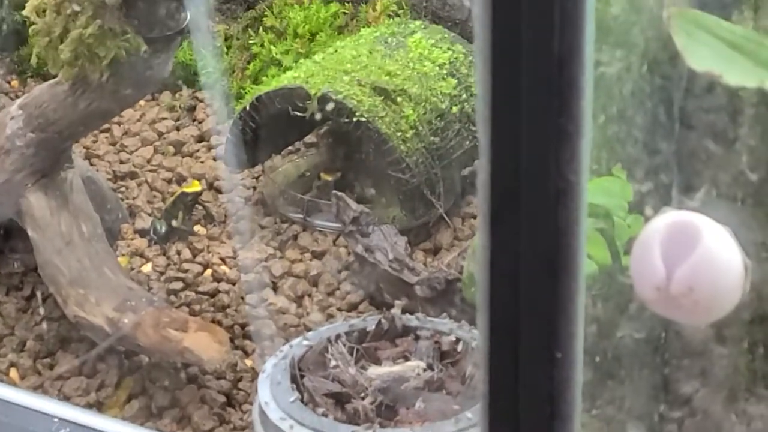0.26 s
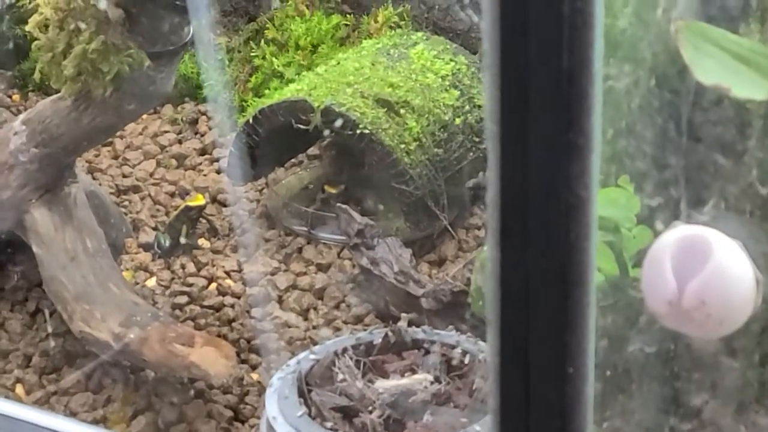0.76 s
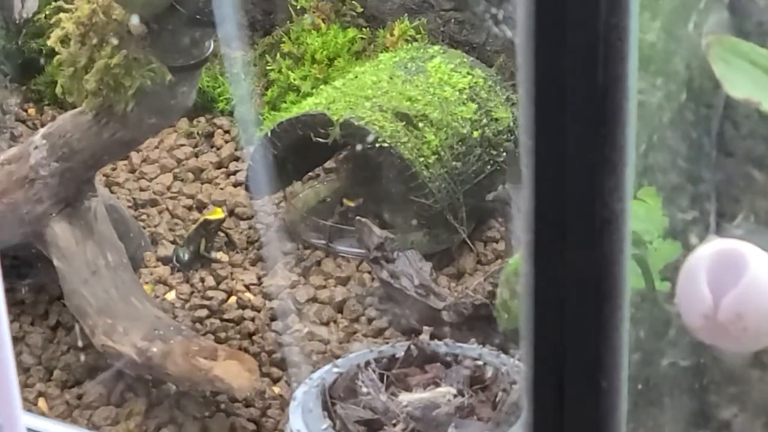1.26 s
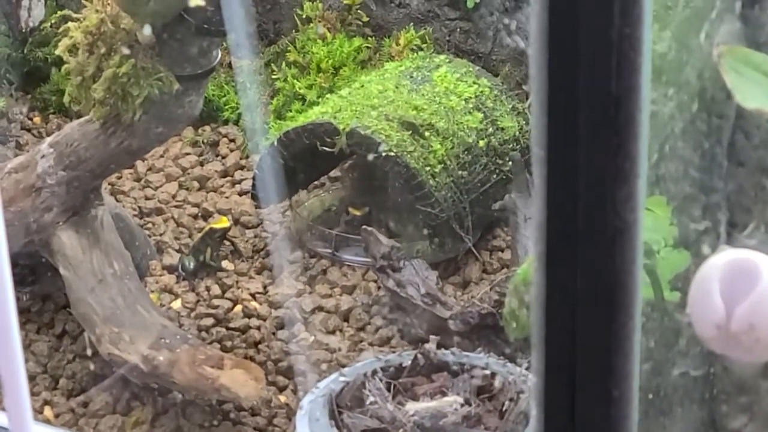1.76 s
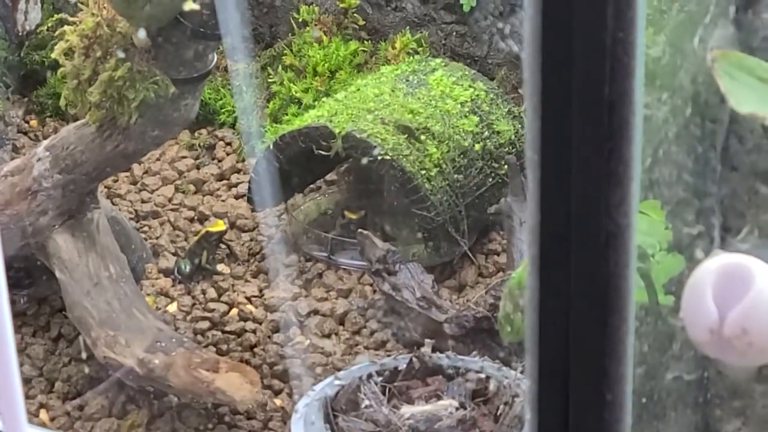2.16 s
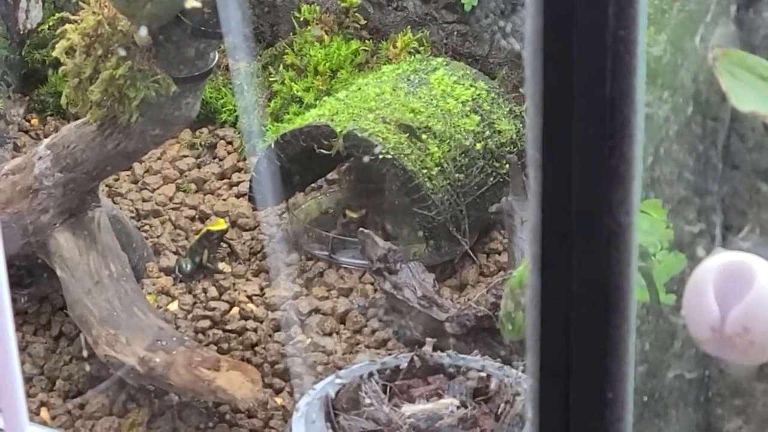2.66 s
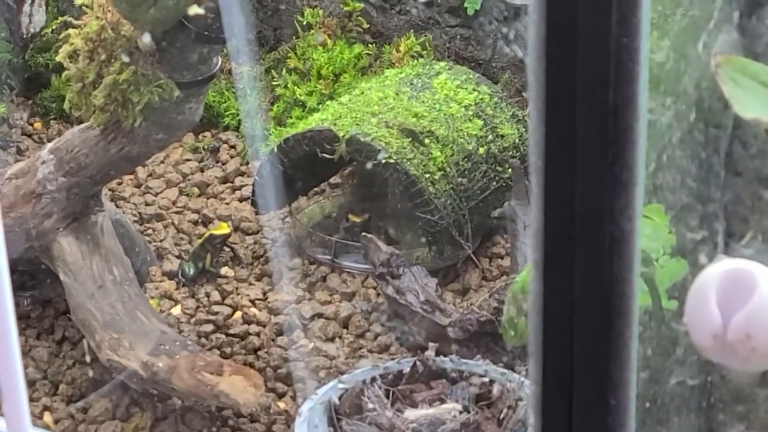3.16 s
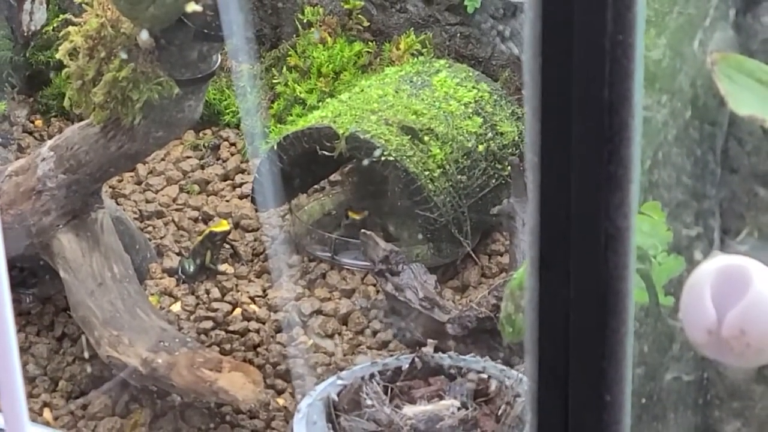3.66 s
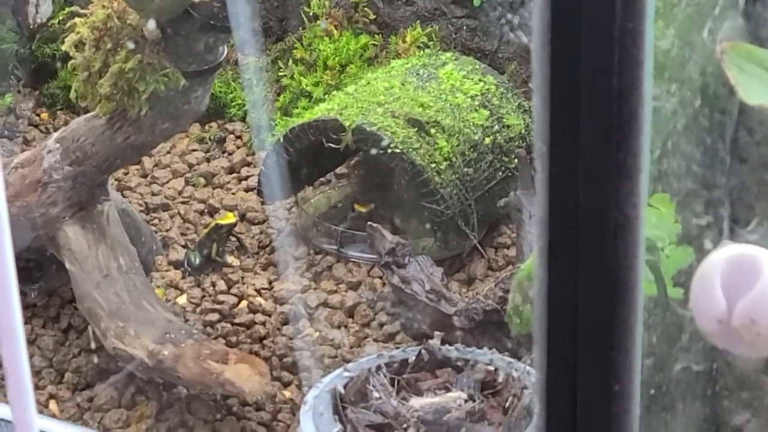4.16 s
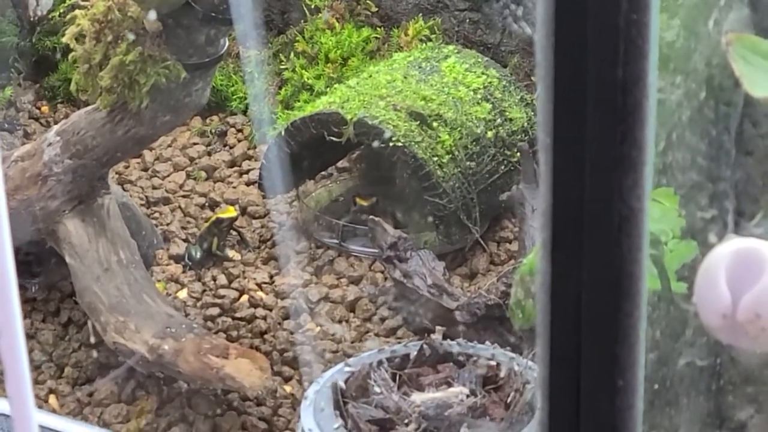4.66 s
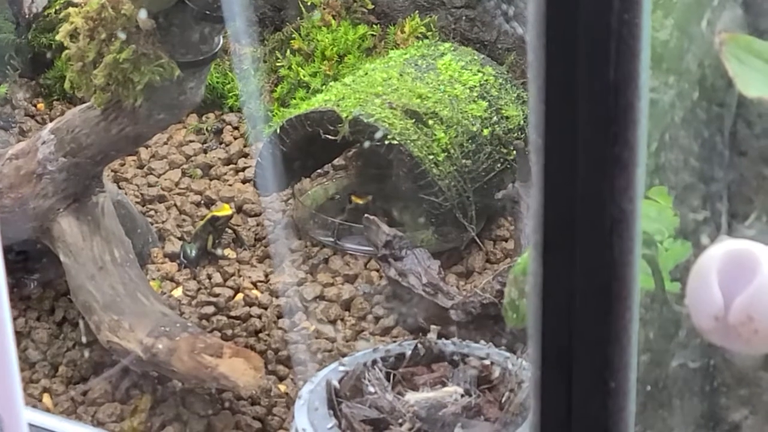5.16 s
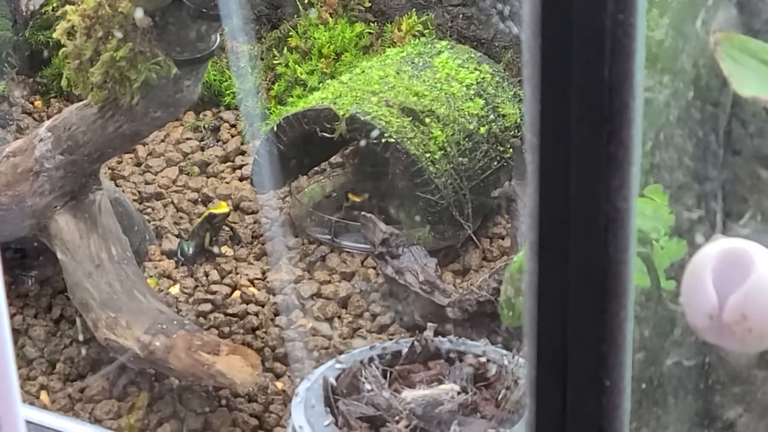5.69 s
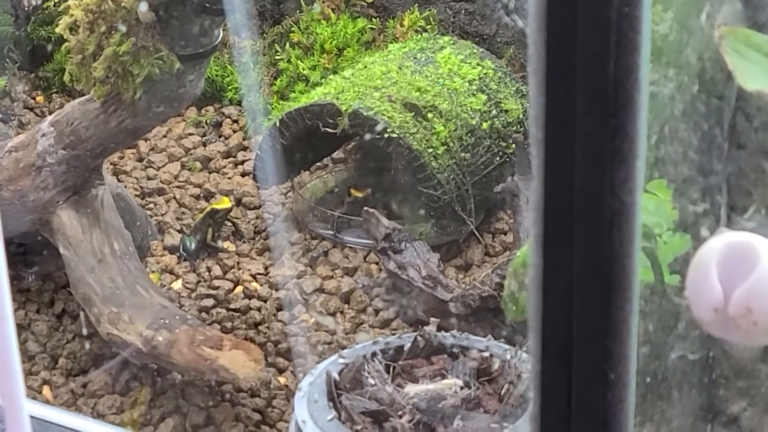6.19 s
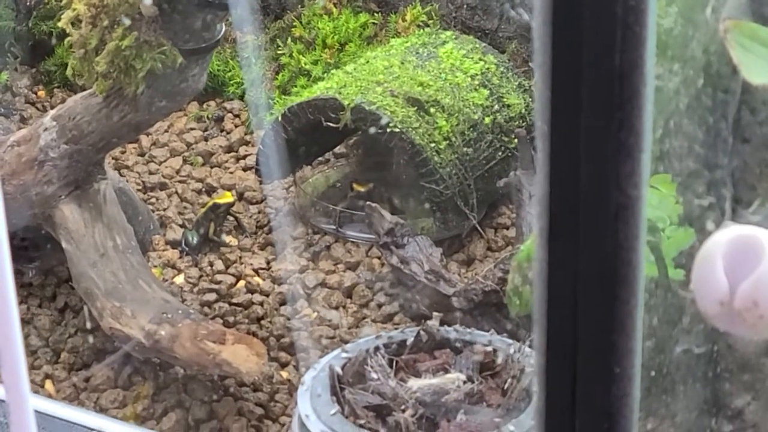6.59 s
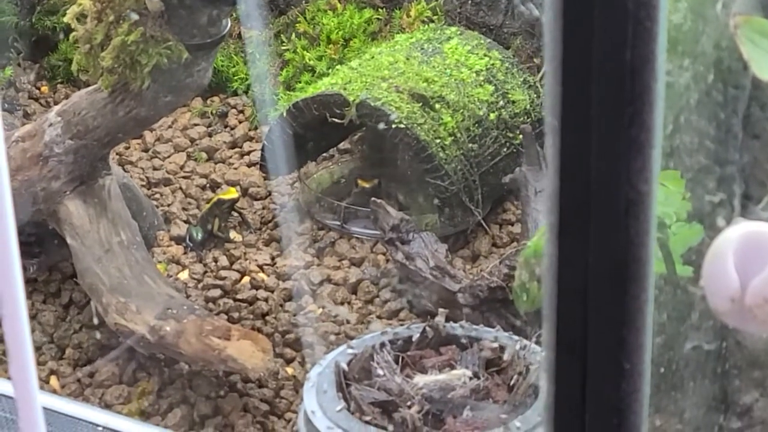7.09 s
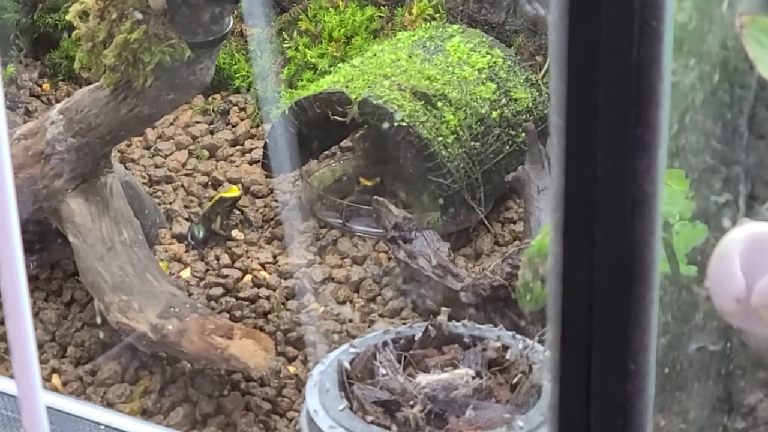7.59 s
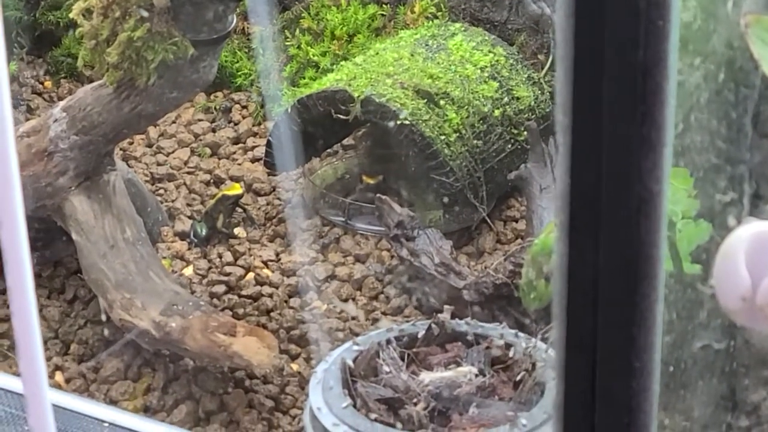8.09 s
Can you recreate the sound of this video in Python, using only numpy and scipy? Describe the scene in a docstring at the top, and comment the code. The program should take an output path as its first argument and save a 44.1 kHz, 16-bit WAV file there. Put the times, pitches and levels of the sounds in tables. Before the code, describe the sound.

A low equipment hum and the soft rush of a fan fill a room. After a few seconds a small frog starts trilling in a glass terrarium, close to the microphone and a little to the right. Its high, buzzy notes come about nine times a second, each a short rasp running into a rising whistle. The trill rings slightly between the panes and continues evenly to the end.

```python
"""A small frog trills in a glass terrarium, about nine notes a second, close to a stereo pair.
Each note is two pushes of air: a rough lead-in from the larynx, then a clean rising whistle
from the vocal sac. It echoes between the panes and is louder at the right microphone.
In the room behind, mains-driven equipment hums and a fan blows softly throughout."""
import sys
import numpy as np
from scipy import signal
from scipy.fft import rfft, irfft
from scipy.io import wavfile
from scipy.ndimage import uniform_filter1d

SR = 44100
rng = np.random.default_rng(int(sys.argv[2]) if len(sys.argv) > 2 else 0)


def waveform_to_disk(signal):
    """Save audio, clipped to [-1, 1], as 16-bit WAV at the path in sys.argv[1]."""
    frames = np.transpose(np.atleast_2d(signal))
    scaled = np.clip(frames, -1, 1) * 32767
    samples = np.round(scaled).astype(np.int16)
    wavfile.write(sys.argv[1], SR, samples)


N = 367794

# reflections off the panes at the left and right microphone: delay/s x 1000, level/dB re direct
ECHOES_LEFT = [(1.4, -5), (16.28, -10), (18.05, -7), (19.81, -14), (32.39, -18), (42.8, -16)]
ECHOES_RIGHT = [(.6, -3), (7.95, -19), (15.65, -11), (19.39, -9), (36.44, -20), (47.29, -18)]
# standing waves inside the tank: f/Hz, relative level/dB, t60/s
TANK_MODES = [(2370, -10.5, 0.55), (2434, -2, 0.17), (2680, -12, 0.31), (2622, -1.5, 0.59),
              (2683, -7.5, 0.74), (2740, -7, .4), (2846, 5, 0.42)]


def frog(ring_db=-4, tail_db=-17.5, buzz_db=-16):
    """The call as it fills the tank, louder at the right microphone."""
    loud, pitch, lead, strength = trill()
    tone, phase = whistle(loud, pitch, lead)
    left = from_db(-6.6) * panes(tone, ECHOES_LEFT)
    right = panes(tone, ECHOES_RIGHT, lag_ms=0.06)
    # standing waves and a diffuse tail form only after several crossings of the tank
    crossed = panes(tone, [], lag_ms=40)
    modes = sum(from_db(db) * resonate(crossed, hz, t60) for hz, db, t60 in TANK_MODES)
    tail = from_db(tail_db) * diffuse(crossed, t60=0.33, build_s=0.03)
    buzz = diffuse(from_db(buzz_db) * strength * larynx_rasp(phase), t60=0.22, build_s=0.00019)
    in_tank = from_db(ring_db) * modes + tail + buzz + peeps()
    return np.array([left, right]) + in_tank * pan(-4.5) + thin_hiss(strength)


# the almost even pace of the trill: t/s, note rate/Hz
TEMPO = [(3.7, 8.83), (4.3, 8.707), (5, 8.802), (6.4, 8.802), (8.3, 8.686)]
# how hard the frog pushes in the lead-in: t/s, effort/0-1
EFFORT = [(3.7, 0.64), (4.15, 0.94), (4.7, .75), (5.5, .4), (6.4, .05), (7.6, 0.03), (8.3, 0.03)]


def trill(start_s=3.670, note_db=-12.5, warm_up_db=4, warm_up_s=0.23, scatter_db=0.27):
    """Loudness, pitch, lead-in share and rasp, note after note; weaker while the frog warms up."""
    loud, lead, rasp = np.zeros((3, N))
    pitch = np.full(N, float(TOP_HZ))
    s = start_s
    while s < N / SR:
        luck, *chance = rng.standard_normal(4)
        at = np.arange(int((s - 0.014) * SR), min(int((s + 0.07) * SR), N))
        gain = from_db(note_db - warm_up_db * np.exp((start_s - s) / warm_up_s) + scatter_db * luck)
        size, pitch[at], lead[at], strength = note(at / SR - s, along(EFFORT, s), chance)
        loud[at], rasp[at] = gain * size, gain * strength
        s += 1 / along(TEMPO, s)
    return loud, pitch, lead, rasp


# the lead-in is soft and flat at rest; a harder push makes it louder and higher
LEAD_DB, LEAD_EFFORT_DB, LEAD_EFFORT_HZ, LEAD_FLAT_HZ = -1.5, 7.5, 84.5, 16
# the whistle follows it and starts with an accent
WHISTLE_DELAY_S, WHISTLE_ATTACK_S, ACCENT_DB, ACCENT_S = 0.025, 0.00394, 4, 0.009
# pitch rises through each note and levels off at the top
TOP_HZ, RISE_HZ, RISE_S, RISE_BEND = 2769, 313.4, 0.053, 1.5
# chance differences from note to note
SCATTER_HZ, LEAD_SCATTER_DB, LEAD_SCATTER_HZ = 8.13, 0.97, 8


def note(t, effort, chance):
    """Loudness, pitch, lead-in share and rasp strength of one note, t seconds after its start."""
    lead_db = LEAD_DB + LEAD_EFFORT_DB * effort + LEAD_SCATTER_DB * chance[0]
    lead_in = from_db(lead_db) * push(t, attack_s=0.0086, hold_s=0.0057, release_s=0.0085)
    late = t - WHISTLE_DELAY_S
    accent = from_db(ACCENT_DB * np.exp(-((late - WHISTLE_ATTACK_S) / ACCENT_S) ** 2))
    main = accent * push(late, WHISTLE_ATTACK_S, hold_s=0.0258, release_s=0.0072)
    lead = 1 - np.clip(late / WHISTLE_ATTACK_S, 0, 1)
    glide_hz = TOP_HZ + SCATTER_HZ * chance[2] - RISE_HZ * np.clip(1 - t / RISE_S, 0, 1) ** RISE_BEND
    lift_hz = LEAD_EFFORT_HZ * effort - LEAD_FLAT_HZ + LEAD_SCATTER_HZ * chance[1]
    return lead_in + main, glide_hz + lift_hz * lead, lead, rasp_strength(t)


def push(t, attack_s, hold_s, release_s):
    """Attack, hold and release of one push of air."""
    return np.clip(np.minimum(t / attack_s, 1 + (attack_s + hold_s - t) / release_s), 0, 1)


def rasp_strength(t, top_db=-2, onset_s=0.0079, hold_s=0.014, rise_db_per_s=452.5, fall_db_per_s=489):
    """The larynx rasps most during the lead-in and dies away under the whistle."""
    before, after = np.maximum(onset_s - t, 0), np.maximum(t - onset_s - hold_s, 0)
    return from_db(top_db - rise_db_per_s * before - fall_db_per_s * after)


# the band that the vocal sac radiates: f/Hz, gain/dB
VOCAL_SAC = [(2100, -11), (2320, -3.5), (2450, 5), (2790, 0), (2870, 8), (2950, -21.5)]


def whistle(loud, pitch, lead, jitter_hz=4, lead_jitter_hz=20, lead_rough=0.21, rough=0.036):
    """The vocal sac's tone and its phase; it flutters in the lead-in, then runs almost clean."""
    hz = pitch + jitter_hz * drift(65) + lead_jitter_hz * lead * drift(112.4)
    phase = 2 * np.pi * np.cumsum(hz) / SR
    size = loud * (1 + (rough + lead_rough * lead) * drift(140))
    return coloured(size * np.sin(phase), VOCAL_SAC, []), phase


# colour of the rasp: f/Hz, relative level/dB
RASP_SPECTRUM = [(1500, -31.5), (1980, -6.5), (2200, 2.5), (2500, 8.5), (3000, -4), (3260, -5.5),
                 (4400, -7), (5300, -8), (6300, -11.5), (7400, -25), (9000, -20), (10200, -28),
                 (11500, -38.5), (16000, -34)]
# tank resonances that the rasp excites: f/Hz, width/Hz, gain/dB
RASP_PEAKS = [(3226, 120, 13), (3756, 100, 8.5), (4195, 92, 6.5), (5060, 50, 3.5), (10100, 78, 10.5)]


def larynx_rasp(phase, snaps_per_s=350, uneven=0.6, hiss=0.23, second_db=-12, fourth_db=-23, smear=0.33):
    """Uneven snaps of the vocal folds with a little air, and the tone's smeared overtones."""
    cycles = np.cumsum(snaps_per_s * np.exp(uneven * drift(250))) / SR
    snaps = rms_one(np.diff(np.floor(cycles), prepend=0) * rng.uniform(0.5, 1, N))
    smeared = phase + smear * drift(330)
    overtones = from_db(second_db) * np.sin(2 * smeared) + from_db(fourth_db) * np.sin(4 * smeared)
    air = hiss * rng.standard_normal(N)
    return rms_one(coloured(snaps + air, RASP_SPECTRUM, RASP_PEAKS)) + overtones


# a faint hoarse try just before the trill: t/s, relative level/dB, f/Hz, half length/s
PEEPS = [(3.589, -34.5, 2700, 0.0021), (3.609, -38, 2800, 0.027)]


def peeps(t60=0.02):
    """Short puffs through the half-filled vocal sac."""
    return sum(from_db(db) * swell(s, half_s) * rms_one(resonate(rng.standard_normal(N), hz, t60))
               for s, db, hz, half_s in PEEPS)


def panes(x, echoes, lag_ms=0):
    """The direct sound and its first reflections off the glass, as they reach one microphone."""
    turn_per_ms = -2j * np.pi * np.arange(N + 1) * SR / (2 * N) / 1000
    paths = 1 + sum(from_db(db) * np.exp(turn_per_ms * ms) for ms, db in echoes)
    return irfft(rfft(x, 2 * N) * paths * np.exp(turn_per_ms * lag_ms))[:N]


def diffuse(x, t60, build_s):
    """Dense reflections that build up and die away, different at each microphone."""
    t = np.arange(SR // 2) / SR
    envelope = np.exp(-np.log(1000) * t / t60) * (1 - np.exp(-t / build_s))
    tail = rms_one(rng.standard_normal((2, len(t))) * envelope) / np.sqrt(len(t))
    return signal.fftconvolve(x[None], tail, axes=1)[:, :N]


def thin_hiss(strength, gain_db=-35, low_hz=8800):
    """A thin hiss rises at both microphones while the trill lasts."""
    highpass = signal.butter(2, low_hz, "high", fs=SR, output="sos")
    noise = rms_one(signal.sosfilt(highpass, rng.standard_normal((2, N))))
    return from_db(gain_db) * uniform_filter1d(strength, size=5000) * noise


# hum lines of the equipment in the room: f/Hz, level/dB before panning
HUM_LINES = [(119.9, -37.5), (239.8, -53), (326.5, -57.5), (359.7, -57), (479.6, -59), (625.3, -53.5),
             (719.4, -65)]
# swells of the low drone: crest t/s, half length/s, relative level/dB
DRONE_SWELLS = [(2.15, 0.26, -52), (5.35, 0.8, -46.5), (6.35, 0.46, -43), (8.1, .7, -56)]


def equipment(waver_hz=0.2554, waver_db=0.27, drone_hz=54, rest_db=-51, drone_trim_db=-2):
    """Motor lines that waver, the higher ones more, over a low drone; a little right of centre."""
    hum = 0
    for hz, db in HUM_LINES:
        unsteady = hz / HUM_LINES[0][0]
        phase = 2 * np.pi * np.cumsum(hz + waver_hz * unsteady * drift(1.64)) / SR
        hum += from_db(db + waver_db * unsteady * drift(1.0)) * rms_one(np.sin(phase))
    swells = sum(from_db(db) * swell(s, half_s) for s, half_s, db in DRONE_SWELLS)
    drone_size = (from_db(rest_db) + swells) * from_db(drone_trim_db + 2 * drift(3.2))
    drone_phase = 2 * np.pi * np.cumsum(drone_hz + 3 * drift(4)) / SR
    return (hum + drone_size * rms_one(np.sin(drone_phase))) * pan(-2.2)


# fan and room noise at the microphones, low and high range: f/Hz, relative level/dB
AIR_LOW = [(15, -20), (35, -3), (60, 1), (92, 3), (112, -10), (160, -13.5), (230, -7.5), (290, -14),
           (420, -8.5), (530, -11), (700, -5.5), (900, -10)]
AIR_HIGH = [(1350, -8.5), (1800, -13), (2800, -13), (4200, -24), (5700, -22.5), (7400, -34.5), (8800, -35),
            (13000, -37.5), (16000, -39)]
# room resonances in that noise: f/Hz, width/Hz, gain/dB
ROOM_PEAKS = [(442.5, 19, 5.5), (767, 15, 5), (1019, 15, 6.5), (1131, 35, 4), (1251, 30, 6),
              (1349, 46, 5.5), (1474, 29, 6), (1670, 11, 2), (1790, 12, -2.5)]
# how alike the two microphones hear it: f/Hz, correlation
AIR_LIKENESS = [(60, 1.0), (130, 0.92), (290, 0.83), (640, 0.65), (1410, 0.0), (3100, -0.08), (6820, 0.05),
                (15000, -0.1)]
# its balance across the pair: f/Hz, left minus right level/dB
AIR_BALANCE = [(60, 3), (700, -1.5), (1300, -1.5), (2400, -4.5), (4400, -7.5), (5700, -8), (7400, 4.5),
               (8800, -4), (13000, 1)]


def fan(level_db=-38.5):
    """Steady moving air in the room, alike at both microphones only in the bass."""
    mid, side = rfft(rng.standard_normal((2, N)))
    alike = at_hz(AIR_LIKENESS)
    sides = np.array([[1], [-1]])
    both = np.sqrt(1 + alike) * mid + np.sqrt(1 - alike) * side * sides
    colour = from_db(at_hz(AIR_LOW + AIR_HIGH) + sides * at_hz(AIR_BALANCE) / 2) * peaks(ROOM_PEAKS)
    return from_db(level_db) * rms_one(irfft(both * colour, N))


def from_db(db):
    """Decibels to gain."""
    return 10 ** (np.asarray(db) / 20)


def rms_one(x):
    """Scale to unit power."""
    return x / np.sqrt(np.mean(x ** 2) + 1e-20)


def pan(db):
    """Microphone gains for a left-minus-right level."""
    return from_db(np.array([[db], [-db]]) / 2)


def along(curve, t):
    """A curve read at time t."""
    return np.interp(t, *np.transpose(curve))


def swell(crest_s, half_s):
    """A bell-shaped rise and fall."""
    return np.exp(-((np.arange(N) / SR - crest_s) / half_s) ** 2)


def drift(rate_hz):
    """Smooth random wander with spread 1."""
    r = np.exp(-40 * np.pi * rate_hz / SR)  # one step every 20 samples
    slow = signal.lfilter([1], [1, -2 * r, r * r], rng.standard_normal(N // 20 + 4002))[4000:]
    return np.interp(np.arange(N) / 20, np.arange(len(slow)), rms_one(slow))


def at_hz(points):
    """A spectrum read at every Fourier bin."""
    hz, value = np.transpose(points)
    return np.interp(np.log(np.arange(N // 2 + 1) * SR / N + 1e-6), np.log(hz), value)


def peaks(rows):
    """Gain of narrow resonances at every Fourier bin."""
    f = np.arange(N // 2 + 1) * SR / N
    return from_db(sum(db / (1 + (2 * (f - hz) / width) ** 2) for hz, width, db in rows))


def coloured(x, spectrum, resonances):
    """Give a signal a broad spectrum and narrow resonances."""
    return irfft(rfft(x) * from_db(at_hz(spectrum)) * peaks(resonances), N)


def resonate(x, hz, t60):
    """A resonance with gain 1 at its peak."""
    r = 1000 ** (-1 / (t60 * SR))
    feedback = [1, -2 * r * np.cos(2 * np.pi * hz / SR), r * r]
    return signal.lfilter(np.array([1, 0, -1]) * (1 - r * r) / 2, feedback, x + 1e-18)


def scene():
    """The frog in front, hum and fan in the room behind."""
    return frog() + equipment() + fan()


def record(dry, threshold_db=-17, squeeze=0.47, release_db_per_s=2, attack_s=0.0094, cutoff_hz=15800):
    """The recorder's gain control ducks a little under the call and recovers slowly; the top is cut."""
    power = uniform_filter1d(np.mean(dry ** 2, axis=0), size=441)
    over_db = np.maximum(10 * np.log10(np.abs(power) + 1e-12) - threshold_db, 0)
    fall_db = release_db_per_s * np.arange(N) / SR
    held_db = np.maximum.accumulate(squeeze * over_db + fall_db) - fall_db
    r = np.exp(-1 / (attack_s * SR))
    ducked = dry * from_db(-signal.lfilter([1 - r], [1, -r], held_db))
    return signal.sosfilt(signal.ellip(12, 0.1, 90, cutoff_hz, fs=SR, output="sos"), ducked)


dry = scene()
out = record(dry)
waveform_to_disk(out)
```